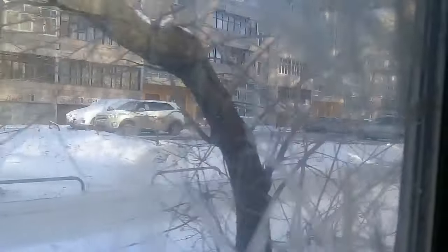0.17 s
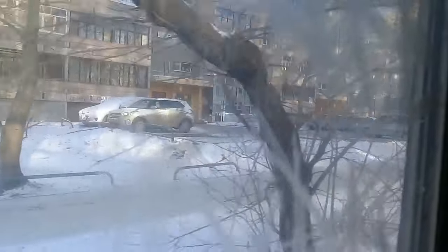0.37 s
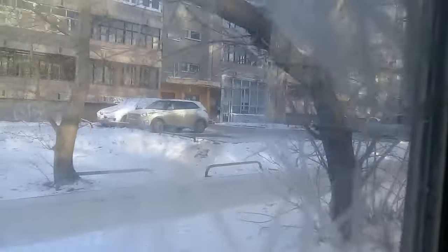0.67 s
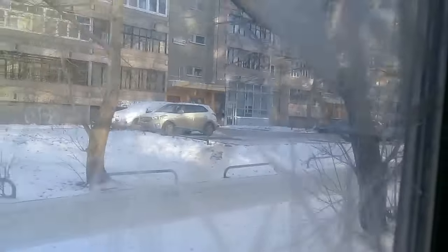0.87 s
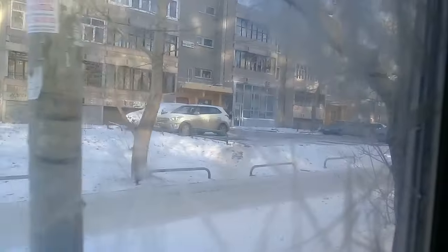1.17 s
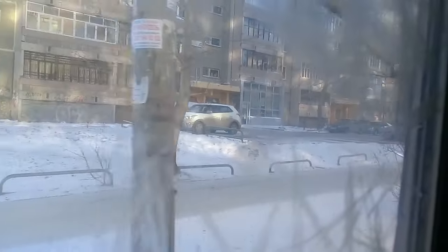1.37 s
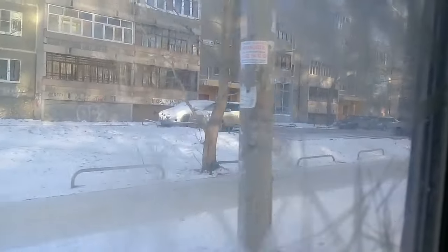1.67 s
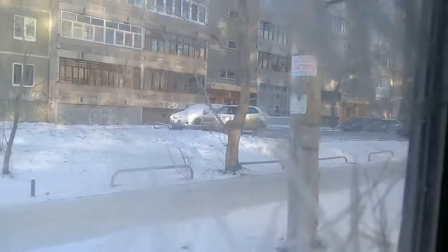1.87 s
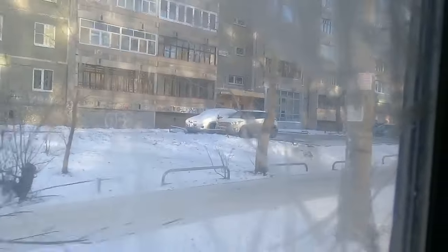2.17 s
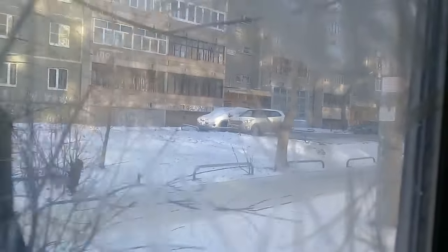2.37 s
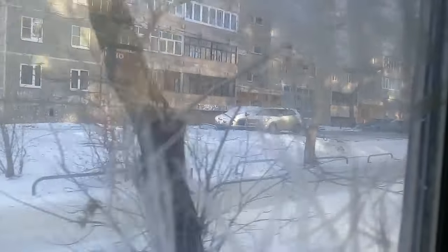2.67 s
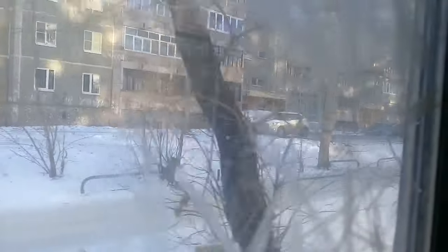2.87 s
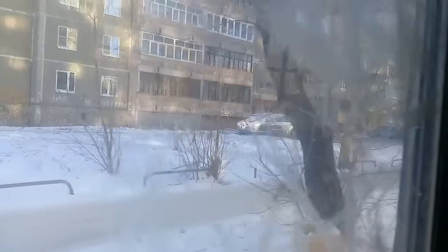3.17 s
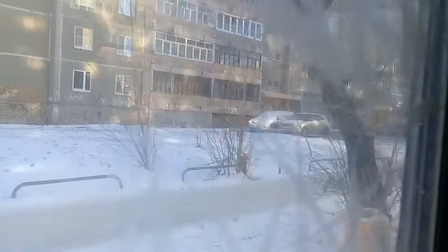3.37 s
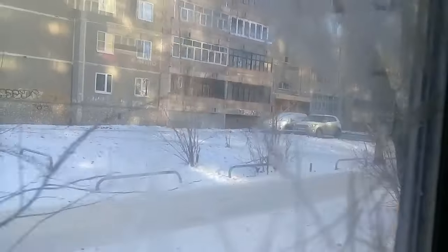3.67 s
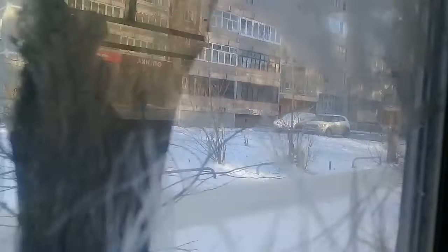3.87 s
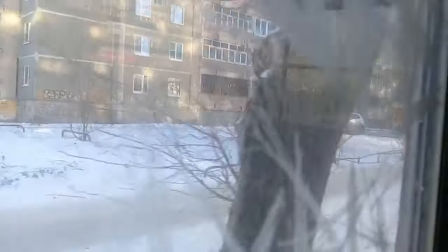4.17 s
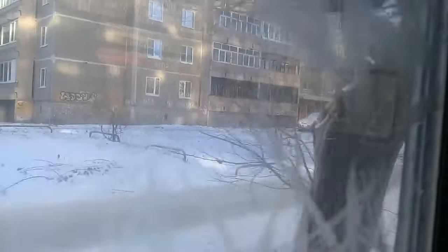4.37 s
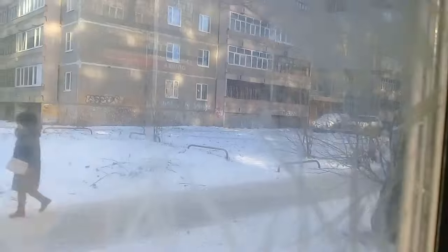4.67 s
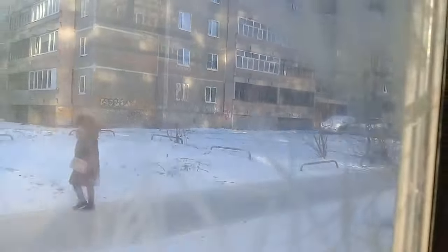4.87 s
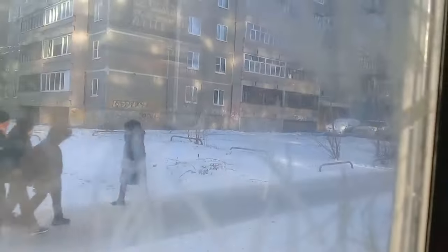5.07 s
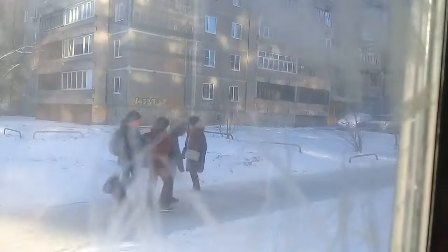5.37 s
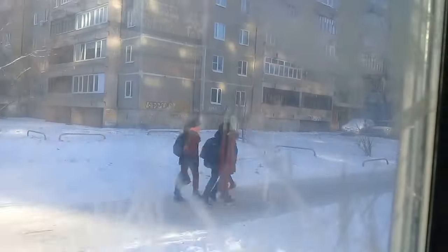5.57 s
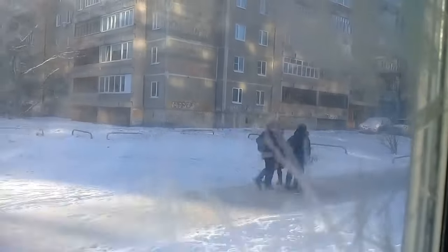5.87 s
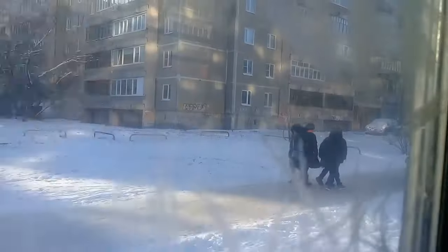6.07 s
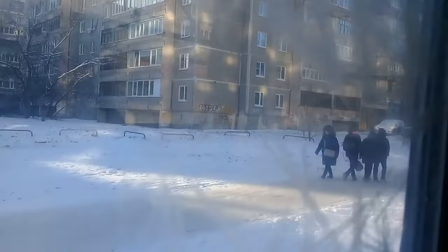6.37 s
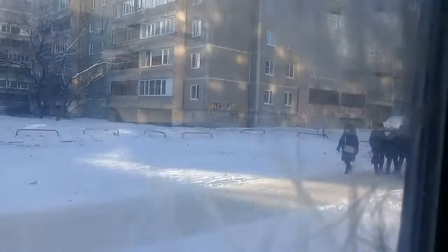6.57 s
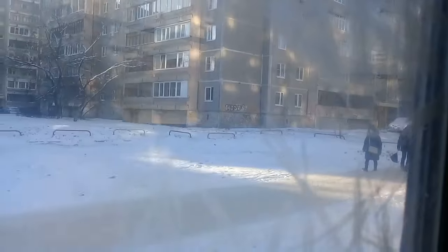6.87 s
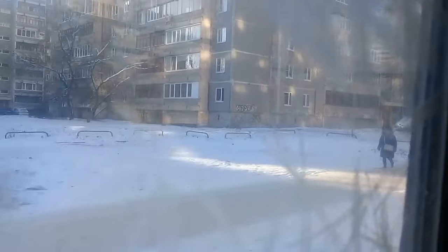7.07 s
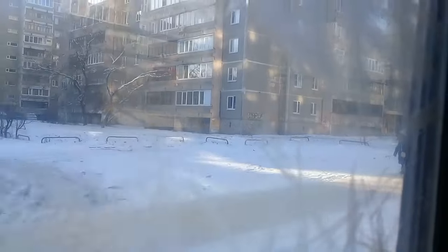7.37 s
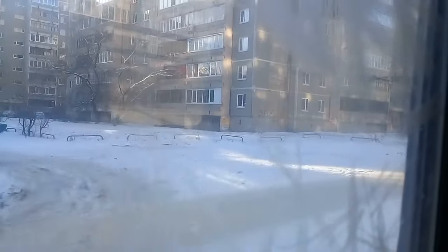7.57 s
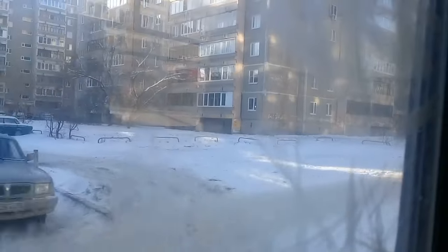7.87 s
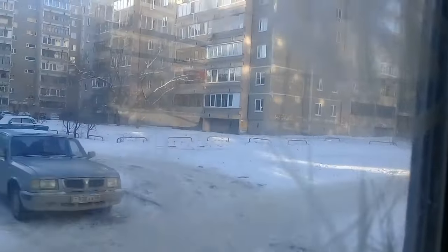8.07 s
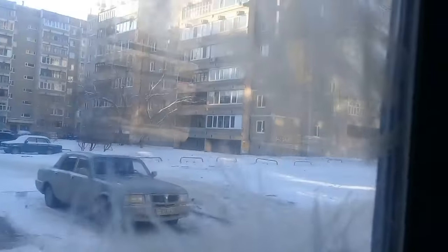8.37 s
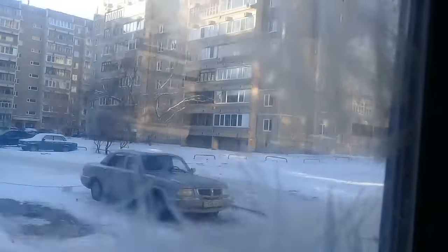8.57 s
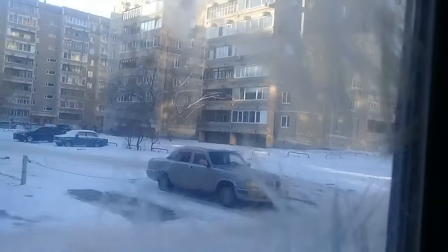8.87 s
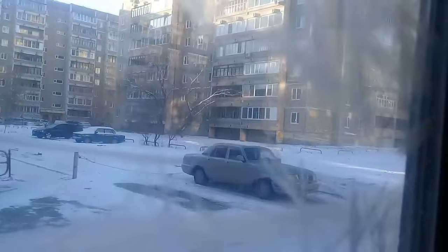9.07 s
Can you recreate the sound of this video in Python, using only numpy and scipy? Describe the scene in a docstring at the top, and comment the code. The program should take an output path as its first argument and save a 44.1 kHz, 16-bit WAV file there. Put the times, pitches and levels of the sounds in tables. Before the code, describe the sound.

Inside a trolleybus gathering speed, motor hum and rising gear whine over tyre rumble, with thumps and clattering doors near the end.

```python
"""Trolleybus gathering speed

Inside a trolleybus on a winter street, the drive shaft drones and the gears whine, rising together over the
rumble of the tyres. A helper motor and its fan hum at a nearly steady pitch. Small fittings tick and a loose
light fitting rattles. Near the end, the wheels drop into ruts, thumping the body and setting the door panels
clattering."""
import sys
import numpy as np
from scipy import signal
from scipy.fft import rfft, irfft, next_fast_len
from scipy.io import wavfile

SR = 44100
rng = np.random.default_rng(int(sys.argv[2]) if len(sys.argv) > 2 else 0)


def put_to_file(sound):
    """Save the sound as 16-bit audio at rate SR, in the file named by the first command-line argument."""
    columns = np.atleast_2d(sound).T  # one column per channel
    safe = np.clip(columns, -1, 1)
    whole_steps = np.round(safe * 32767)
    wavfile.write(sys.argv[1], SR, whole_steps.astype(np.int16))


N = 407043
T = np.arange(N) / SR


def amp(db):
    """Turns decibels (dB) into a number to multiply a sound by."""
    return 10 ** (np.asarray(db) / 20)


def unit(x):
    """Scales a signal to an average power of 1."""
    return x / np.sqrt(np.mean(x ** 2) + 1e-20)


def curve(rows):
    """Joins (seconds, value) points with straight lines, giving a value for every sample."""
    return np.interp(T, *np.transpose(rows))


def add(mix, start_s, sound):
    """Adds a sound to the mix at the given time."""
    part = mix[max(round(start_s * SR), 0):][:len(sound)]
    part += sound[:len(part)]


def colour(x, spectrum, tilt_db=0, modes=()):
    """Makes some frequencies stronger and others weaker; white noise keeps its overall power."""
    size = next_fast_len(len(x) + SR // 10)
    hz = np.fft.rfftfreq(size, 1 / SR) + 1
    point_hz, point_db = np.transpose(spectrum)
    level = np.interp(np.log(hz), np.log(point_hz), point_db)
    level += tilt_db * np.log2(np.clip(hz, 600, 6000) / 2800)
    level -= 30 * np.log2(np.maximum(hz / point_hz[-1], 1))  # fades above the last point
    ringing = sum(amp(db) / (1 + 2j * (hz - centre) / width) for centre, width, db in modes)
    gain = amp(level) * (1 + ringing)
    return irfft(rfft(x, size) * gain / np.sqrt(np.mean(abs(gain) ** 2)), size)[:len(x)]


def drift(rate_hz):
    """A slow random wander, mostly slower than rate_hz."""
    hz = np.fft.rfftfreq(N // 100, 100 / SR)
    slow = irfft(rfft(rng.standard_normal(N // 100)) / (1 + (hz / rate_hz) ** 4))
    return unit(np.interp(T, np.linspace(0, T[-1], len(slow)), slow))


def tone(hz, db, shake_db, wobble, rate_hz):
    """A machine tone whose strength and pitch waver as the body shakes."""
    phase = 2 * np.pi * (np.cumsum(hz) / SR + rng.random()) + wobble * drift(rate_hz)
    return np.sqrt(2) * amp(db + shake_db * drift(rate_hz)) * np.sin(phase)


# The bus speeding up. Each row: time in seconds, turns of the drive shaft per second.
SHAFT_SPEED = [(0, 50.7), (1, 64.8), (2, 76.8), (3, 86.8), (4.5, 100.4), (6, 111.2), (7.5, 118.6),
               (9.23, 125.8)]
CRUISE_TURNS_PER_S = 100


def road_level(cruise_db, speed_db, rough_db):
    """Tyre noise gains speed_db from rest to cruising speed, and rough_db on a broken stretch."""
    middle_s, half_length_s = 8.39, 0.27
    rough = np.exp(-((T - middle_s) / half_length_s) ** 2)
    return cruise_db + speed_db * (curve(SHAFT_SPEED) / CRUISE_TURNS_PER_S - 1) + rough_db * rough


# The low, middle and high parts of the tyre noise. Each row: frequency in Hz, relative level in dB.
TYRE_RUMBLE = [(20, -11.5), (32, -21.5), (42, -4), (58, -2), (75, 4), (120, 4.5), (190, 4), (250, -4.5),
               (340, -6.5), (450, -9), (560, -19), (900, -73)]
TYRE_ROAR = [(250, -13.5), (480, -7.5), (560, 0), (720, -0.5), (900, -6), (1150, -8.5), (1400, -11),
             (1800, -18.5), (3000, -60.5)]
TYRE_HISS = [(820, -17), (1400, 0), (1780, -6), (2400, -6), (2850, -7.5), (3300, -10.5), (3750, -24),
             (4400, -27), (5200, -27), (5600, -37), (6600, -49.5), (11000, -49), (15500, -49)]


def tyres():
    """Rumble comes through the floor; roar and hiss, jogged by the uneven road, through the windows."""
    jog = drift(11)
    low, mid, high = rng.standard_normal((3, N))
    rumble_db = road_level(cruise_db=-23.5, speed_db=4, rough_db=5.5)
    roar_db = road_level(cruise_db=-39.5, speed_db=2.5, rough_db=3) + 0.5 * jog
    hiss_db = road_level(cruise_db=-46.5, speed_db=9.6, rough_db=6) + 0.54 * jog + 0.46 * drift(35)
    return (colour(low, TYRE_RUMBLE) * amp(rumble_db)
            + colour(mid, TYRE_ROAR) * amp(roar_db)
            + colour(high, TYRE_HISS) * amp(hiss_db))


# How fast the helper motor spins. Each row: time in seconds, turns per second.
MOTOR_SPEED = [(0, 46.8), (2, 46.7), (3, 46.1), (3.8, 45.72), (6, 47.04), (7, 47.4), (9.23, 47.65)]
# The tones in its hum. Each row: multiple of the turning rate, dB added to the hum's level.
MOTOR_TONES = [(1, -9.5), (2, -20.5), (3, -5), (5, 0.5), (6, -10.5), (13, -25), (15, -32.5)]
# How loud the hum and the fan are. Each row: time in seconds, level in dB.
HUM_LEVEL = [(0, -26), (2.2, -26), (4.2, -24), (6.4, -29), (7.25, -27), (7.6, -40), (8.4, -26.5),
             (9.23, -32.5)]
FAN_LEVEL = [(0, -19.5), (1.9, -19), (3.4, -27), (5.8, -24.5), (7.5, -30.5), (7.85, -23.5), (8.3, -34.5),
             (9.23, -25.5)]


def helper_motor(fan_ratio=3.085):
    """The motor hums; its fan's blade tone beats slowly against the hum at three times the turning rate."""
    hz, hum_db = curve(MOTOR_SPEED), curve(HUM_LEVEL)
    hum = sum(tone(multiple * hz, hum_db + db, shake_db=1.42, wobble=0.031, rate_hz=5.3)
              for multiple, db in MOTOR_TONES)
    fan = tone(fan_ratio * hz, curve(FAN_LEVEL), shake_db=1.1, wobble=0.08, rate_hz=3.6)
    return hum + fan


# The clearest snaps of small fittings. Each row: start in seconds, relative level in dB.
FITTING_SNAPS = [(0.4884, -50), (1.9533, -48), (2.035, -49), (4.702, -51), (4.8943, -51), (4.9856, -46.5),
                 (5.4538, -43.5), (6.185, -48), (6.4203, -46), (7.8414, -43), (7.9884, -48.5),
                 (8.1354, -33), (8.2523, -31), (8.3707, -34), (9.0376, -43.5)]
# The tone colour of a snap. Each row: frequency in Hz, relative level in dB.
SNAP_COLOUR = [(600, -12.5), (1500, -1), (3100, 6), (3800, 2), (5200, 4), (6300, -17), (8000, -21),
               (9500, -16.5), (11500, -21), (15000, -24.5)]


def fitting_ticks(level_db=-2, decay_s=0.0019, tail_db=-18, tail_s=0.016, stray_count=18):
    """Fittings snap against their mounts, with faint stray snaps more often at speed."""
    out, t = np.zeros(N), T[:SR // 10]
    shaking = np.cumsum(curve(SHAFT_SPEED) ** 2)
    strays = [(np.interp(rng.random(), shaking / shaking[-1], T), -56 + 1.5 * rng.standard_normal())
              for _ in range(stray_count)]
    snap = np.exp(-t / decay_s) + amp(tail_db) * np.exp(-t / tail_s)  # the cabin adds the tail
    for start_s, db in FITTING_SNAPS + strays:
        add(out, start_s, amp(db + level_db) * snap * rng.standard_normal(len(t)))
    return colour(out, SNAP_COLOUR)


def cabin_echo(x, fade_s=0.06, echo_db=2):
    """The direct sound plus a short, dense echo from glass and seats."""
    t = T[:SR // 10]
    tail = rng.standard_normal(len(t)) * amp(-60 * t / fade_s)
    response = amp(echo_db) * unit(tail) / np.sqrt(len(t))
    response[0] += 1
    return signal.fftconvolve(x, response / np.linalg.norm(response))[:len(x)]


def rattle(jolts, spectrum, modes, level_db, knocks_per_s, spread_db, slap_db):
    """Each jolt slaps a loose part against its mount, then a flurry of tiny knocks makes it ring."""
    out, t = np.zeros(N), T[:2 ** 15]
    lead = 512  # silent samples in front, as the filter spreads sound both ways in time
    for start_s, db, rise_s, decay_s, tilt_db in jolts:
        knocks = (rng.random(len(t)) < knocks_per_s / SR) * rng.choice([-1, 1], len(t))
        sizes = amp(spread_db * rng.standard_normal(len(t)))
        swell = np.minimum(t / rise_s, 1) * np.exp(-np.maximum(t - rise_s, 0) / decay_s)
        flurry = unit(knocks * sizes * swell) * np.sqrt(np.mean(swell ** 2))
        suddenness = min(0.0081 / rise_s, 1)  # only a sudden jolt slaps hard
        slap = amp(slap_db) * suddenness * np.exp(-t / 0.004) * rng.standard_normal(len(t))
        push = np.pad(cabin_echo(flurry) + slap, (lead, 0))
        add(out, start_s - lead / SR, amp(db + level_db) * colour(push, spectrum, tilt_db, modes))
    return out


# Jolts of the light fitting. Each row: start in seconds, relative level in dB, build-up in seconds, # fading
# time in seconds, added brightness in dB per octave.
LAMP_JOLTS = [(1.345, -59, .025, 0.039, 4), (1.527, -41.5, .003, 0.028, -5.5),
              (1.566, -37, 0.0062, 0.05, -2), (2.33, -56.5, .05, .07, 1), (2.58, -50, 0.017, .05, -3.5),
              (3.13, -64, 0.016, 0.04, 8), (5.015, -43.5, 0.025, .06, -1.5),
              (5.062, -44.5, 0.0088, 0.038, -2), (5.63, -52.5, 0.0079, 0.051, -0.5),
              (6.708, -41, .016, 0.08, -4), (6.76, -60, 0.033, 0.13, 4.5), (7.29, -62, 0.026, 0.23, 9),
              (8.936, -46.5, .002, 0.014, 0), (9.117, -43, 0.0039, 0.12, 0.5)]
# The light fitting's tone colour. Each row: frequency in Hz, relative level in dB.
LAMP_COLOUR = [(700, -2.5), (1500, 1.5), (2300, -0.5), (3250, 2), (3650, -13), (4500, -11), (5200, -13.5),
               (6300, -27.5), (9000, -36.5), (15000, -47.5)]
# The pitches it rings at. Each row: pitch in Hz, width in Hz, strength in dB.
LAMP_RINGS = [(2380, 200, -3.5), (2840, 320, 1), (3300, 200, -6.5), (3760, 370, -2.5), (5040, 300, -6)]


def lamp_rattle():
    """A loose light fitting rattles now and then with uneven knocks."""
    return rattle(LAMP_JOLTS, LAMP_COLOUR, LAMP_RINGS,
                  level_db=4, knocks_per_s=1100, spread_db=4.5, slap_db=2)


# Jolts of the door panels. Each row: start in seconds, relative level in dB, build-up in seconds,
# fading time in seconds, added brightness in dB per octave.
DOOR_JOLTS = [(8.122, -31, 0.0098, 0.05, -1), (8.2, -37, 0.027, 0.16, 2.5),
              (8.265, -22, 0.0045, 0.052, 2.5), (8.36, -34.5, 0.036, 0.042, 2),
              (8.416, -24.5, 0.0019, 0.044, 4), (8.43, -27.5, 0.011, 0.042, 3.5),
              (8.514, -30.5, .003, 0.091, 1.5), (8.564, -25.5, .005, 0.038, 3),
              (8.765, -36.5, 0.012, 0.037, -0.5)]
# The panels' tone colour. Each row: frequency in Hz, relative level in dB.
DOOR_COLOUR = [(300, -8), (600, 10.5), (1100, 3.5), (1450, 1.5), (1900, 2.5), (2850, -0.5), (3300, 2),
               (3750, -13.5), (5200, -13.5), (6300, -29), (8000, -31), (11000, -31), (15500, -41)]
# The pitches they ring at. Each row: pitch in Hz, width in Hz, strength in dB.
DOOR_RINGS = [(1544, 120, 4.5), (2010, 130, -17), (2600, 88, -4), (2835, 49, 7.5), (3240, 27, -57),
              (4240, 52, -14), (5020, 72, -13)]


def door_clatter():
    """The door panels clatter with closely packed knocks on the broken stretch of road."""
    return rattle(DOOR_JOLTS, DOOR_COLOUR, DOOR_RINGS,
                  level_db=4, knocks_per_s=1800, spread_db=2, slap_db=1.5)


# Wheels dropping into ruts. Each row: start in seconds, level in dB.
WHEEL_DROPS = [(3.295, -24), (8.08, -16.5), (8.265, -9.5), (8.41, -11.5), (8.49, -12.5)]
# The deep boom of the body. Each row: frequency in Hz, relative level in dB.
THUMP_COLOUR = [(25, -38.5), (55, -6), (90, -0.5), (170, 6.5), (280, -2), (400, -17.5), (700, -20),
                (1200, -49)]


def body_thumps(rise_s=0.016, decay_s=0.06):
    """The body booms at each drop of the wheels, then settles."""
    swell = np.minimum(T / rise_s, 1) * np.exp(-np.maximum(T - rise_s, 0) / decay_s)
    power = np.zeros(N)
    for start_s, db in WHEEL_DROPS:
        add(power, start_s, (amp(db) * swell) ** 2)
    return colour(rng.standard_normal(N), THUMP_COLOUR) * np.sqrt(power)


# The howling tones. Each row: multiple of the shaft's turning rate, full level in dB,
# speed where it starts in turns per second, flutter in dB.
GEAR_HOWLS = [(3, -42, 87, 4), (6, -48, 106, 4.5)]


def gear_howl(growth_turns_per_s=8):
    """As the shaft passes certain speeds, the gears grow into a rough howl."""
    hz, out = curve(SHAFT_SPEED), np.zeros(N)
    for multiple, db, start_speed, flutter_db in GEAR_HOWLS:
        strength = np.clip((hz - start_speed) / growth_turns_per_s, 0, 1)
        out += strength * tone(multiple * hz, db, flutter_db, wobble=0.98, rate_hz=10)
    return out


# Pitches at which the cabin booms. Each row: pitch in Hz, width in Hz, boost in dB.
CABIN_BOOMS = [(82, 24, 8), (113.5, 7, 13), (125.46, 3.6, 12), (178, 25, 9), (206, 14, 4.5), (345, 35, 5),
               (388, 14, 6), (414.9, 20, 10), (446.7, 24, 8.5), (491, 41, 6), (558, 20, 4.5),
               (673, 21, 5.5)]


def cabin_boost_db(hz):
    """How much louder a tone gets as it slides through the cabin's own pitches."""
    return sum(db / (1 + (2 * (hz - centre) / width) ** 2) for centre, width, db in CABIN_BOOMS)


# How hard the drive pulls: it slackens briefly twice, then eases off before the broken stretch.
# Each row: time in seconds, change of level in dB.
DRIVE_PULL = [(0, 1), (1.2, 0), (4.1, -0.5), (4.25, -9), (4.4, 3), (5.1, 1.5), (5.22, -12), (5.5, 0),
              (6.65, 0), (7.6, -7), (8.7, -8), (9.05, -5.5), (9.23, -8)]
# The shaft's drone. Each row: multiple of its turning rate, base level in dB at cruising speed,
# share of the pull that it follows from 0 to 1.
SHAFT_TONES = [(1, -35.5, 0.5), (2, -36, .8)]
# Gear teeth meeting. Each entry: pitch as a multiple of the shaft's turning rate.
GEAR_MULTIPLES = [4, 5.86, 6.04]
# Each entry: base level in dB of the matching gear tone.
GEAR_LEVELS = [-42.5, -47.5, -48]


def shaft_and_gears(imbalance_db_per_octave=12, floor_hz=520, floor_db_per_octave=12.5):
    """The out-of-balance shaft drones louder with speed, and the gears whine with the pull."""
    speed, pull_db, out = curve(SHAFT_SPEED), curve(DRIVE_PULL), np.zeros(N)
    imbalance_db = imbalance_db_per_octave * np.log2(speed / CRUISE_TURNS_PER_S)
    for multiple, db, share in SHAFT_TONES:
        hz = multiple * speed
        drone_db = db + imbalance_db + share * pull_db + cabin_boost_db(hz)
        out += tone(hz, drone_db, shake_db=1.5, wobble=0.19, rate_hz=6.7)
    for multiple, db in zip(GEAR_MULTIPLES, GEAR_LEVELS):
        hz = multiple * speed
        loss_db = floor_db_per_octave * np.log2(np.maximum(hz / floor_hz, 1))  # the floor muffles highs
        whine_db = db + pull_db + cabin_boost_db(hz) - loss_db
        out += tone(hz, whine_db, shake_db=2.3, wobble=0.33, rate_hz=9)
    return out


def scene():
    """Everything heard at a window seat, in one channel."""
    rattles = lamp_rattle() + door_clatter()
    machines = shaft_and_gears() + gear_howl() + helper_motor()
    return (rattles + machines + tyres() + body_thumps() + fitting_ticks())[None]


def record(dry, noise_db=-81, fade_s=0.006, top_hz=15700):
    """Adds faint microphone hiss, softens the start and stop, and cuts the highest treble."""
    fade = np.clip(np.minimum(T, T[-1] - T) / fade_s, 0, 1)
    heard = fade * (dry + amp(noise_db) * rng.standard_normal(N))
    treble_cut = signal.firwin(511, top_hz, window=("kaiser", 9), fs=SR)
    return signal.oaconvolve(heard, treble_cut[None], "same")


dry = scene()
out = record(dry)
put_to_file(out)
```